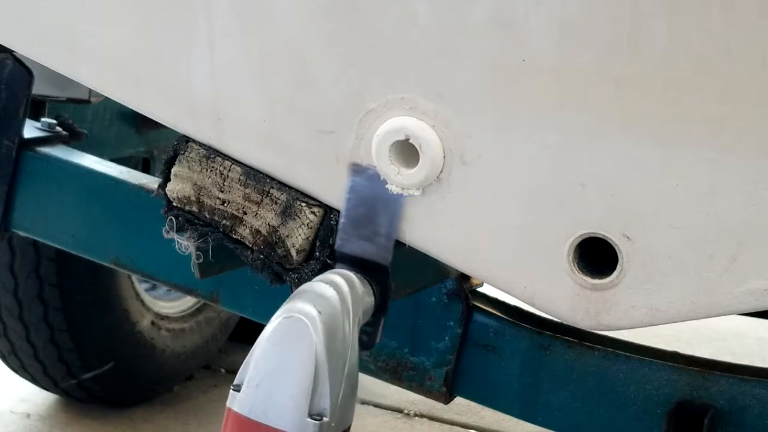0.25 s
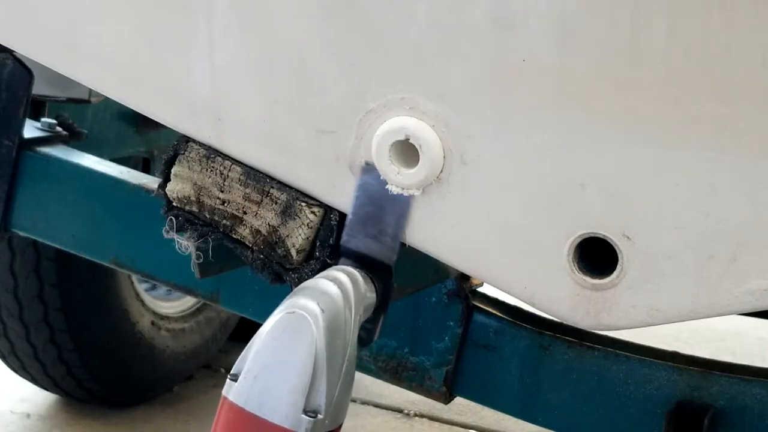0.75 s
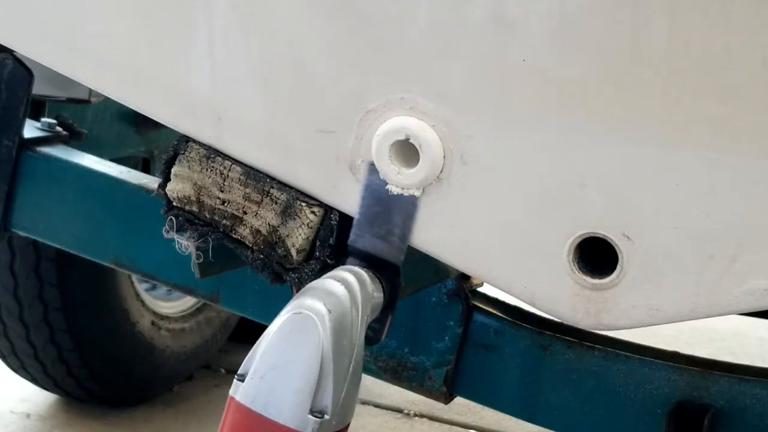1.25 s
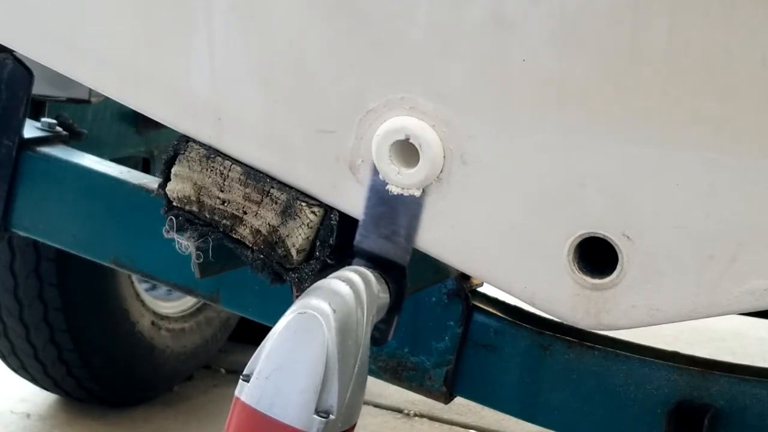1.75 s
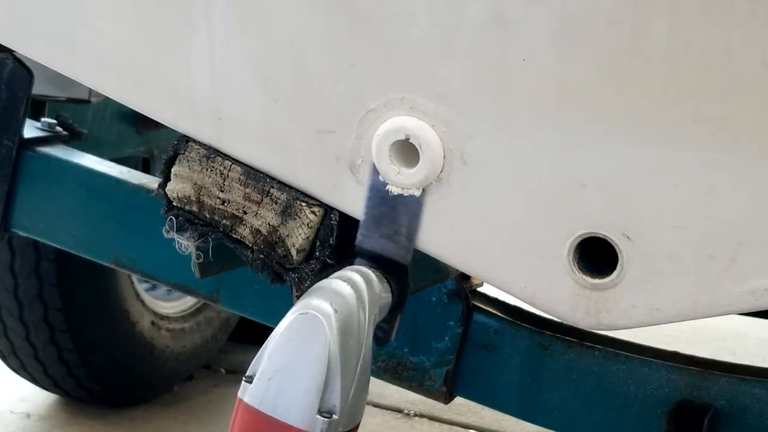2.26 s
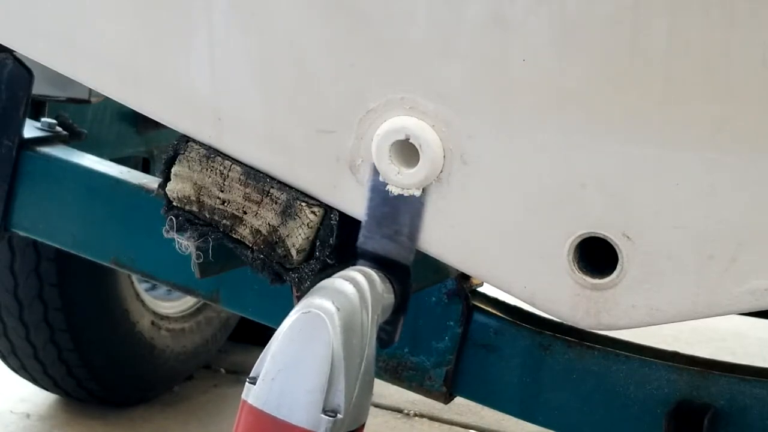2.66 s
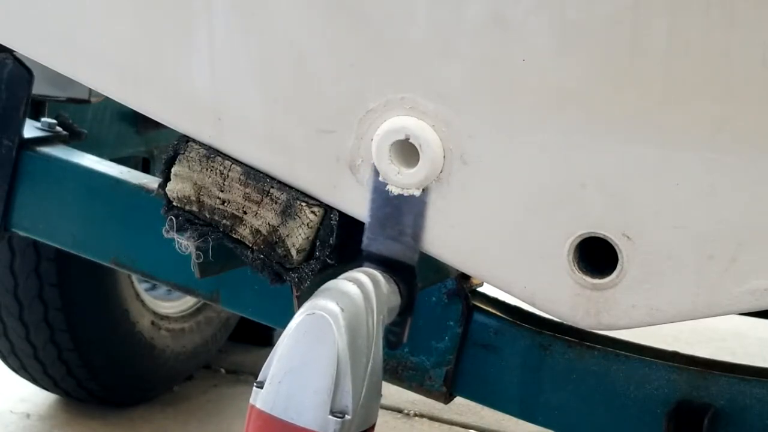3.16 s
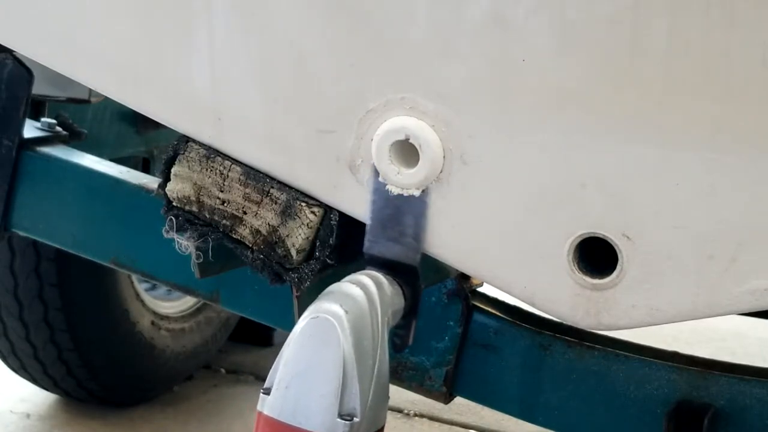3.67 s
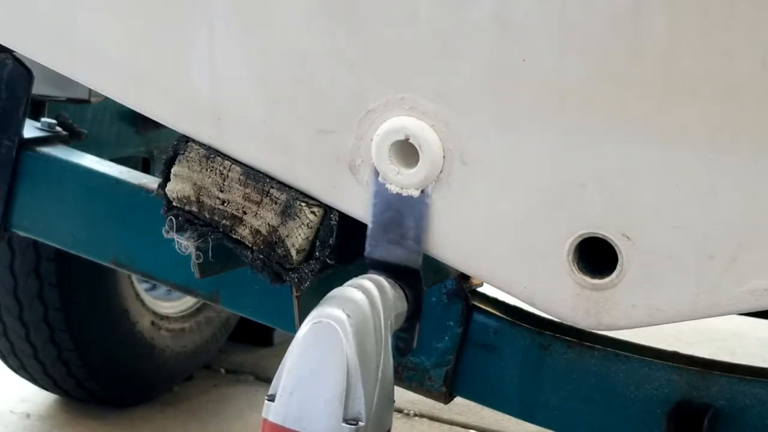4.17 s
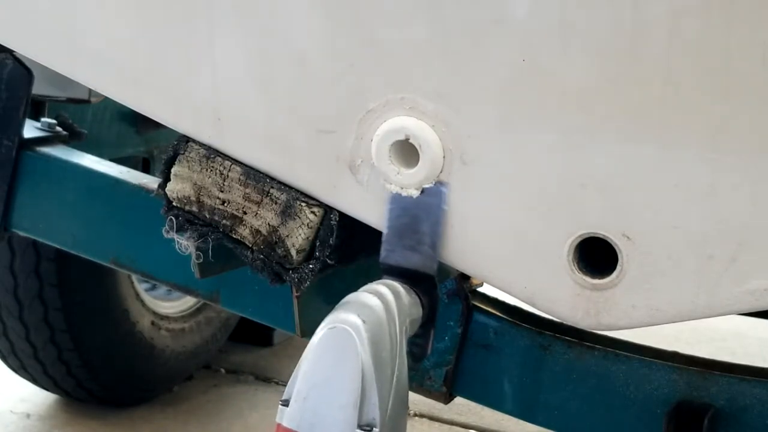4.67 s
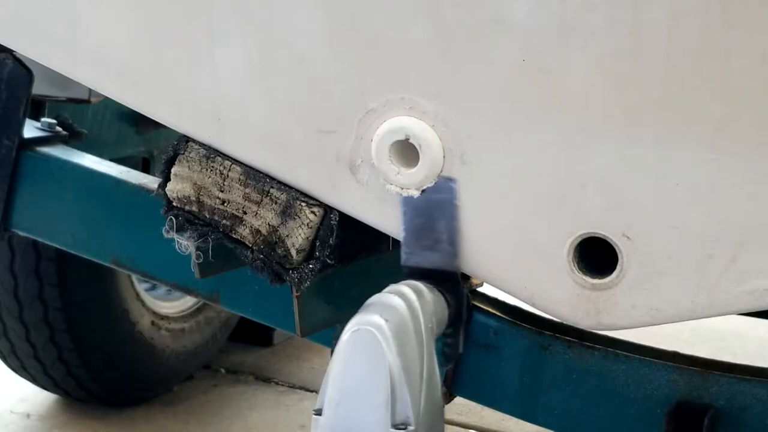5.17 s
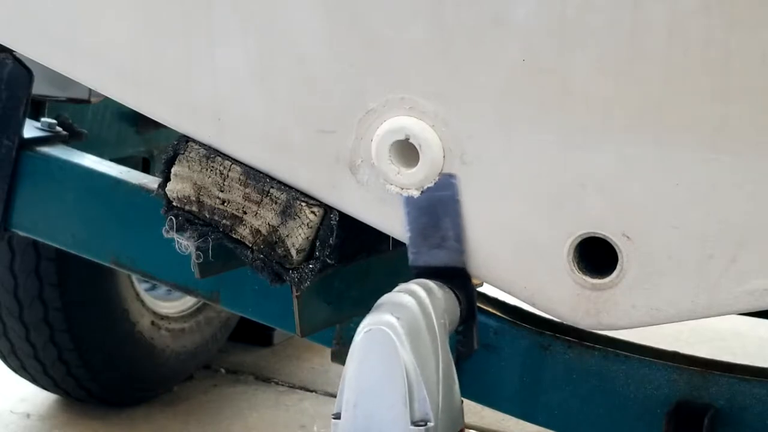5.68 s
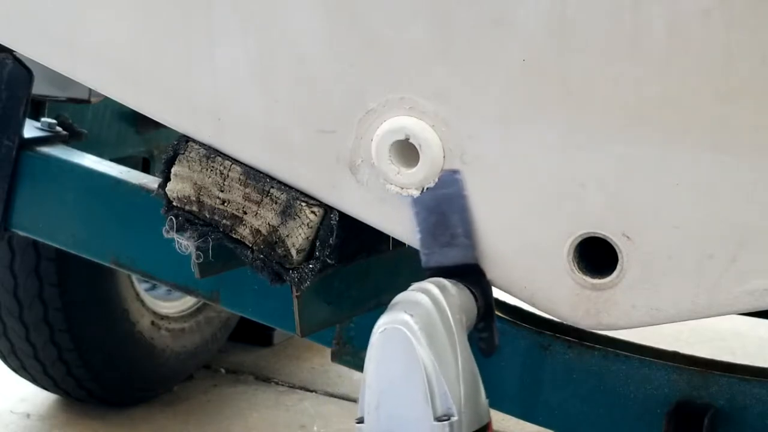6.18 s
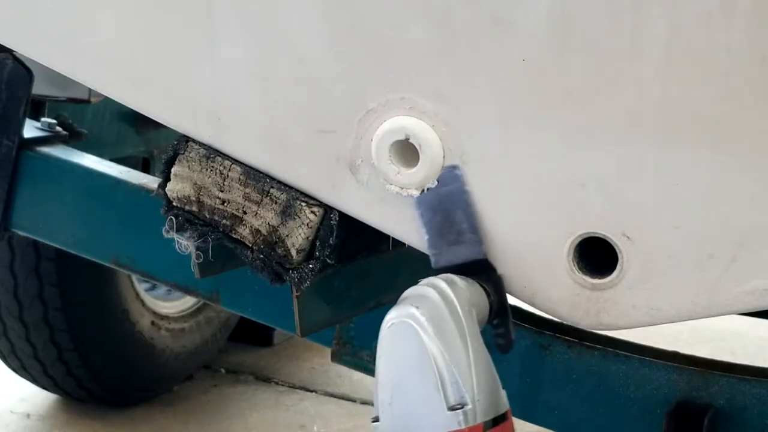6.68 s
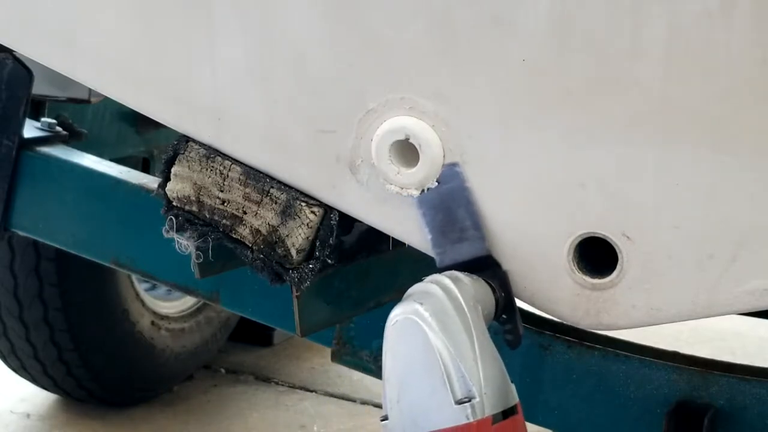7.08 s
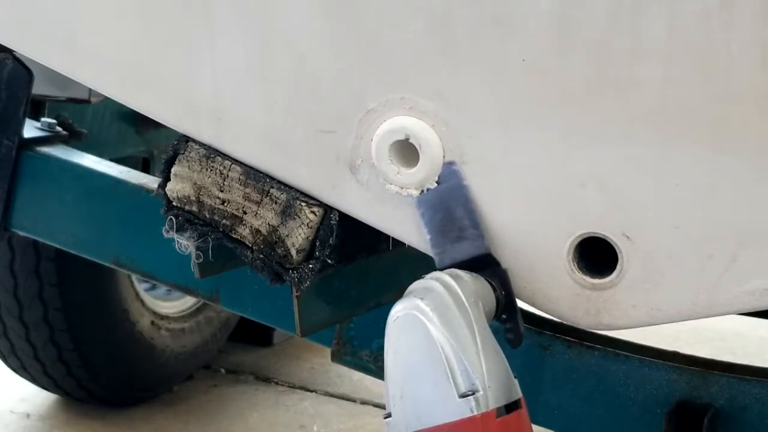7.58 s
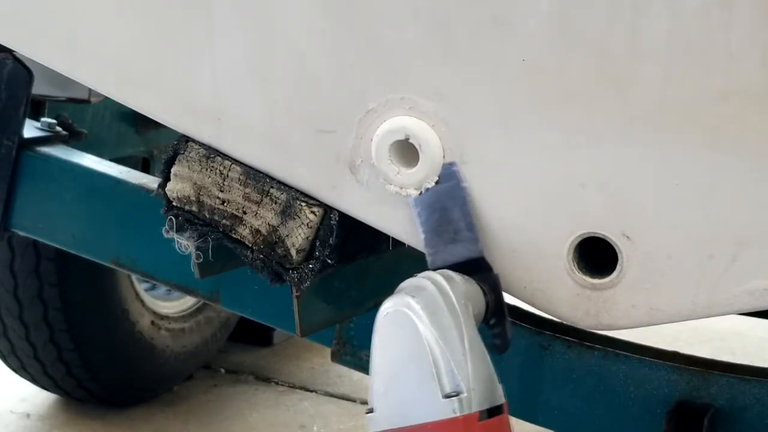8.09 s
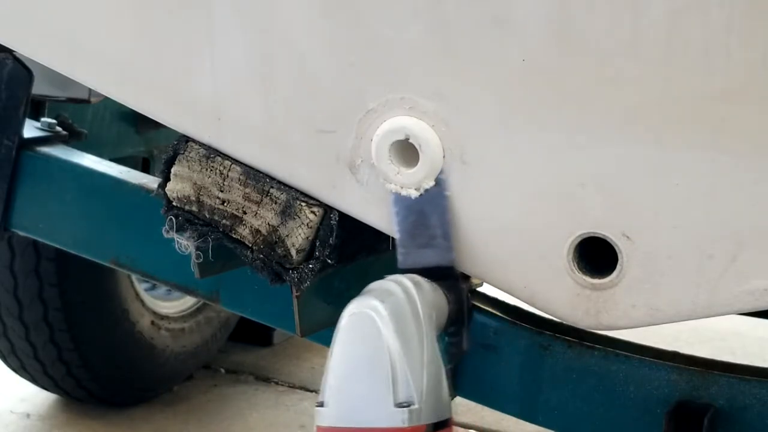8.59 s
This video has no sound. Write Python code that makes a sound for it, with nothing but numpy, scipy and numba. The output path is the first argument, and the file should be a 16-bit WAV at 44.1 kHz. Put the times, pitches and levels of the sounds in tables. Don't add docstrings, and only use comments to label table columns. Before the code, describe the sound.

An oscillating multi-tool is already running at the start, close in stereo outdoors, with a steady, nasal electric buzz, clean and rich in overtones, over airy motor whirr. The first half second is light and dull at the teeth. From about 0.7 seconds the blade bites the fibreglass hull: grinding brightens, a short high ring flashes, and the pitch slides down by nearly an octave, reaching a heavy, throaty growl at about 2.6 seconds with low boat and trailer shudder. It stays bogged until 3.5, then climbs. Around 4.3 to 4.8 the teeth nearly lift and the grit and buzz thin out, before full, bright cutting resumes near the highest recovered pitch at 5.3. A thin metallic singing rides above until 6.7. A rough chatter burst comes near 6.1, a stronger one at 7.2 to 7.7, a short one at 8.45, while pitch sags gradually to the cut-off at 8.8, still running.

```python
import sys
import numpy as np
from scipy import signal
from scipy.fft import rfft, irfft, next_fast_len
from scipy.io import wavfile
from scipy.ndimage import uniform_filter1d
from numba import njit

SR = 44100
rng = np.random.default_rng(int(sys.argv[2]) if len(sys.argv) > 2 else 0)


def pcm_store(signal):
    levels = np.round(np.clip(np.atleast_2d(signal), -1, 1) * 32767)
    wavfile.write(sys.argv[1], SR, levels.astype(np.int16).T)


def gain_from_db(level_db):
    decades = np.asarray(level_db, float) / 20
    return 10 ** decades


N = 389844
STEP = 128

# time in seconds, strokes per second.
SPEED = [(0.0, 246.0), (0.5, 247.0), (0.69, 242.1), (0.86, 232.2), (1.92, 159.7), (2.17, 151.6),
         (2.58, 140.7), (2.98, 144.9), (3.53, 148.4), (4.0, 167.7), (4.34, 187.7), (4.53, 208.9),
         (5.13, 224.8), (5.3, 226.1), (6.07, 218.4), (7.49, 212.9), (7.93, 200.1), (8.84, 187.8)]
# time in seconds, push on the panel in dB, bite of the teeth in dB.
CUT = [(0, -44.5, -32.5), (.2, -50.5, -31.5), (.85, -35, -29), (1.15, -33.5, -30), (1.7, -24.5, -31),
       (2.05, -37.5, -30.5), (2.5, -28.5, -32), (2.8, -16, -30.5), (3.5, -18.5, -32.5), (3.85, -42, -34),
       (4.25, -27.5, -33.5), (4.4, -49.5, -34), (4.9, -33, -28.5), (6.2, -28.5, -28), (7.15, -27, -28),
       (7.55, -18.5, -27.5), (8.45, -20.5, -31.5), (8.84, -30.5, -34)]
# start and end in seconds, grinding in dB, buzz in
# dB, dullness in dB.
EASES = [
    (-.1, .65, -3, 0, 11),
    (7.16, 7.7, 0, -3, 0),
    (4.325, 4.775, -12, -8, 14),
]

# frequency in Hz, correlation from 0 to 1.
LIKENESS = [(60, .97), (130, 0.99), (200, 0.99), (330, 0.79), (640, 0.9), (1410, 0.19), (3100, 0.3),
            (6820, 0.46), (15000, 0.19)]
# frequency in Hz, left over right in dB.
LEAN = [(60, 0.0), (110, 0.0), (200, 0.0), (380, -0.5), (700, -0.5), (1290, -1.0), (2380, 1.0), (4400, 0.0),
        (8120, -1.0), (15000, -2.0)]

# frequency in Hz, density in dB per Hz.
WHIRR = [(25, -31), (60, -16.5), (145, -19.5), (290, -25.5), (470, -10.5), (750, -6), (1200, -5.5),
         (1900, -2.5), (4150, -8.5), (5500, -14), (7200, -23.5), (10300, -20), (13000, -23), (15500, -21)]
# order in multiples of the stroke rate, level in dB.
BEARING = [(2.56, -43), (3.56, -56), (7.44, -52), (10.56, -54)]

# frequency in Hz, density in dB per Hz.
KNOCK = [(60, -36), (85, -9), (120, -1.5), (300, -6.5), (700, -6), (1500, -1.5), (2800, -2.5), (5000, -21),
         (7000, -24)]
# centre in Hz, width in Hz, lift in dB.
KNOCK_RING = [(4680, 360, 24.5)]
# start and end in seconds, lift in dB.
BOUTS = [
    (0, 3.7, 9),
    (1.9, 3.4, 3),
    (4.6, 5.95, 5),
    (5.95, 6.28, 19),
    (6.1, 6.25, 5),
    (7.15, 7.76, 22),
    (7.16, 7.3, 5),
    (7.48, 7.68, 4),
    (7.76, 8.1, 8),
    (8.4, 8.54, 21),
]

# frequency in Hz, density in dB per Hz.
GRIT = [(150, -35), (250, -15), (277, -20), (507, -47), (658, -5), (755, -21), (882, -18.5), (961, -15),
        (1290, -8), (3700, -14), (4630, -8.5), (7250, -29), (10200, -10.5), (13000, -20), (15500, -28.5)]
# centre in Hz, width in Hz, lift in dB.
GRIT_MODES = [(9650, 600, 3.5), (12850, 280, 8.5)]
# start and end in seconds, lift in dB, pitch in Hz.
RINGS = [(-.1, .62, -12, 4930), (0.806, 0.918, 9, 4550), (1.099, 2.106, 5, 4720), (2.24, 2.467, 3.5, 4740),
         (2.853, 3.307, 2.5, 4660), (3.9, 4.31, 7.5, 4800), (4.55, 4.741, 3, 4360), (5.208, 5.85, 6, 4700),
         (5.845, 6.107, 8, 5380), (6.308, 7.012, 10, 4550), (7.007, 7.501, 10, 4670),
         (7.52, 8.452, 7, 4870), (8.61, 8.77, 9, 4700)]
# start and end in seconds, lift in dB.
SINGS = [
    (-.1, .78, -10),
    (.8, .92, 22),
    (3.5, 4.3, 9.5),
    (4.5, 4.75, 2),
    (4.8, 6.7, 13.5),
    (4.84, 4.96, 3),
    (7.7, 8.1, -5),
    (6.7, 7.4, 4),
    (8.45, 8.9, 8),
]
# start and end in seconds, lift in dB, pitch in Hz.
PLATE_RINGS = [
    (.66, 1.0, 14, 10000),
    (1.6, 2.4, 9, 10000),
    (2.8, 3.45, 11, 9600),
    (4.8, 5.8, 13, 9550),
    (5.8, 7.45, 11, 10000),
    (7.55, 8.15, 14, 9650),
    (8.15, 8.9, 9, 9900),
]

# centre in Hz, width in Hz, lift in dB.
PANEL = [(292.6, 32, 15.5), (341, 83, 13.5), (571, 31, 11), (669.8, 99, 16), (918, 237, 17)]
# start and end in seconds, order, lift in dB.
SHIFTS = [(.03, 0.088, 1, -9), (0.086, .15, 1, 12.5), (0.3, .22, 1, -5), (0.238, 0.31, 1, 12),
          (0.2, .54, 1, -7), (1.296, 1.405, 1, 7), (1.4, 1.65, 1, -5.5), (2, 2.17, 1, -8),
          (2.138, 2.15, 1, 10), (2.229, 2.4, 1, 8), (3.84, 3.923, 1, -19), (4.345, 4.378, 1, -12),
          (0, 0.65, 2, 9.5), (0.855, 1.01, 2, 13), (2, 2.498, 2, -5), (3.757, 4.096, 4, -10),
          (7.495, 8.5, 2, 2), (0.145, 0.224, 3, 6.5), (0.77, 1.3, 3, 3.5), (4.31, 4.72, 3, -4),
          (4.994, 6.1, 3, 2.5), (7.5, 7.7, 3, -4.5), (1.7, 2.16, 4, 3), (2.6, 3.318, 4, -17),
          (4.296, 4.764, 4, -6), (5.989, 6.294, 4, -4.5), (7.28, 8.195, 4, 10.5), (8.59, 8.9, 4, 7.5),
          (5, 6, 2, 3.5), (1, 1.05, 4, 5), (1.35, 2.9, 4, -2), (6.9, 7.5, 2, -10), (5.6, 5.97, 4, 1),
          (7.45, 7.56, 4, -4), (2.5, 2.46, 1, -6), (2.5, 2.55, 1, -9), (4.5, 5.1, 2, -7)]
# time in seconds, half-order level in dB.
LIMP = [
    (8.36, -95),
    (8.43, -42),
    (8.55, -38),
    (8.68, -42),
    (8.78, -70),
]
# frequency in Hz, level in dB.
BUZZ = [(410, -33), (700, -15.5), (920, -6), (1110, -3), (1500, -3), (2220, -3.5), (3790, -13),
        (4420, -7.5), (5950, -15), (7110, -31.5), (8600, -32), (10400, -22), (12000, -62), (15600, -49),
        (22000, -120)]
# centre in Hz, width in Hz, lift in dB.
HULL = [(956, 63, 9.5), (1759, 120, 4.5), (2980, 680, 4.5)]
# centre in Hz, width in Hz, lift in dB.
SEAMS = [(1500, 24, 3.5), (1817, 74, 8), (1890, 24, 7.5), (2195, 100, 6.5), (2500, 150, -1.5)]
# start and end in seconds, lift in dB.
MIRRORED = [
    (1.4, 4.5, -6.5),
]
# start and end in seconds, order, lift in dB.
SWELLS = [(0.073, 0.27, 10, 6.5), (0.535, 0.73, 8, 8.0), (0.547, 0.75, 13, 7), (0.55, 0.95, 10, 4.0),
          (0.81, 1.13, 5, 4), (0.85, 0.93, 9, 5), (0.963, 1.17, 7, 7), (0.97, 1.365, 11, 5.5),
          (1.329, 2.61, 6, 6), (1.351, 1.83, 12, 3.5), (1.412, 2.21, 7, 4.5), (1.723, 1.823, 11, 7.5),
          (1.79, 2.754, 13, 5.0), (2.13, 2.253, 13, 6.5), (2.23, 2.33, 9, 7), (2.55, 3.83, 8, 2.5),
          (2.79, 4.39, 12, 4.5), (2.93, 3.563, 10, 7), (3.45, 3.771, 5, 6.5), (3.493, 3.69, 7, 5),
          (3.512, 3.71, 6, 5.5), (4.67, 4.99, 11, 6), (4.925, 5.893, 7, 4.0), (5.05, 5.21, 13, 6),
          (5.25, 5.492, 8, 4.5), (5.43, 6.23, 11, 4), (5.886, 7.49, 7, 5.5), (6.45, 6.8, 14, 5),
          (6.79, 7.032, 12, 7), (6.83, 8.11, 11, 3), (7.211, 7.33, 7, 6), (7.531, 8.17, 10, 4.5),
          (7.584, 7.826, 7, 8.5), (7.849, 8.81, 13, 4), (7.868, 8.83, 6, 3), (8.33, 8.53, 5, 6.5),
          (8.346, 8.83, 9, 5), (3.97, 4.2, 13, 2), (4.38, 4.5, 11, -9)]
# start and end in seconds, order, lift in dB.
GLINTS = [(0.29, 0.49, 18, 8.0), (0.59, 0.99, 14, 5), (0.63, 1.27, 15, 6.0), (0.71, 2.31, 30, 6),
          (0.97, 1.29, 22, 5.5), (0.97, 2.25, 32, 6.0), (1.17, 2.77, 34, 4.5), (1.35, 1.67, 18, 7.5),
          (1.55, 3.15, 28, 3), (1.67, 1.77, 23, 12), (1.93, 3.53, 22, 2), (1.99, 3.59, 24, 3),
          (2.11, 2.23, 15, 9.5), (2.33, 3.93, 36, 7.5), (2.53, 2.73, 14, 12), (2.631, 3.025, 27, 7.0),
          (2.67, 2.99, 17, 3), (2.69, 2.89, 16, 11), (2.77, 4.37, 20, 4.5), (2.87, 3.67, 26, 6.5),
          (3.01, 3.41, 23, 2), (3.53, 3.85, 34, 10), (3.71, 3.83, 30, 11.5), (4.71, 5.99, 15, 3.5),
          (5.07, 5.17, 24, 9), (5.15, 6.43, 25, 5.0), (5.25, 6.85, 16, 4.5), (5.37, 5.776, 14, 6.5),
          (5.45, 6.09, 35, 5), (5.55, 7.15, 18, 3), (5.63, 5.87, 17, 10), (5.73, 6.05, 19, 6),
          (5.73, 7.01, 36, 8.5), (6.23, 6.625, 27, 6), (6.314, 6.549, 21, 10), (6.51, 6.711, 26, 7),
          (6.53, 6.608, 15, 7), (6.549, 6.787, 22, 10), (6.61, 7.012, 24, 4), (7.27, 7.39, 22, 4),
          (7.267, 7.428, 21, 10), (7.48, 7.787, 23, 10), (7.63, 7.87, 21, 5), (7.772, 8.09, 24, 4),
          (8.27, 8.43, 26, 7.5)]
# start and end in seconds, order, lift in dB.
FADES = [(-0.01, 0.63, 9, -4.5), (0.49, 0.65, 6, -12), (0.95, 2.55, 23, -5), (1.15, 1.347, 5, -3),
         (1.25, 1.73, 25, -7.5), (1.45, 1.53, 11, -10.5), (1.45, 2.09, 10, -8.0), (1.91, 2.016, 11, -15),
         (2.128, 2.45, 12, -8.0), (2.23, 2.55, 11, -5.5), (2.27, 2.358, 13, -14), (2.43, 4.03, 31, -6.5),
         (2.63, 3.59, 15, -5.5), (2.91, 3.55, 19, -8), (3.77, 5.05, 29, -8), (3.85, 5.13, 25, -2),
         (4.127, 5.087, 10, -3.5), (4.272, 5.87, 5, -6.5), (4.674, 6.27, 8, -3.5), (4.77, 6.37, 28, -5.5),
         (4.83, 5.63, 12, -5), (4.99, 5.39, 21, -8), (5.09, 5.73, 22, -10.0), (5.71, 6.51, 6, -2.5),
         (5.73, 7.33, 23, -9), (5.87, 7.15, 21, -5.5), (5.89, 6.29, 29, -12.5), (5.97, 7.57, 13, -6.0),
         (6.01, 7.61, 19, -4.0), (6.03, 6.23, 24, -12.0), (6.673, 7.15, 7, -2), (6.95, 7.03, 21, -9.0),
         (7.05, 7.29, 17, -13), (7.07, 7.71, 24, -8.5), (7.17, 7.969, 20, -7.5), (7.373, 7.85, 25, -6.5),
         (7.41, 8.69, 22, -11), (7.51, 7.99, 14, -9.0), (7.61, 8.01, 26, -9.0), (7.69, 8.652, 16, -8),
         (7.71, 8.51, 27, -6.0), (7.87, 8.11, 23, -4), (7.87, 8.67, 21, -13), (7.875, 8.83, 5, -8.0),
         (7.91, 8.11, 9, -8), (8.067, 8.27, 24, -14), (8.13, 8.289, 8, -7), (8.27, 8.75, 29, -12),
         (8.45, 8.77, 24, -9), (8.513, 8.83, 10, -8)]
# start and end in seconds, order, lift in dB.
MORE_LIFTS = [(0.39, 0.51, 7, -12.5), (0.49, 0.548, 12, 12), (0.97, 1.61, 10, -4), (1.01, 1.09, 8, -10),
              (1.01, 1.09, 20, -16.5), (1.21, 1.61, 15, -5.5), (1.45, 1.51, 5, -12.0), (1.49, 1.97, 17, -8.0),
              (1.95, 2.35, 6, -6), (1.97, 2.09, 13, -12.5), (2.47, 2.71, 12, 10.0), (2.61, 3.41, 9, 3.5),
              (2.67, 3.63, 7, 4.5), (2.709, 3.67, 18, 6.5), (2.83, 3.47, 17, -7.5), (2.87, 3.83, 6, -4),
              (2.95, 3.35, 8, -7.0), (2.95, 3.35, 21, -8.5), (2.95, 3.91, 19, -8.0), (2.97, 3.93, 13, -4.5),
              (2.99, 3.23, 20, -13.0), (3.67, 4.07, 14, -9.0), (3.93, 4.25, 7, -10.5), (4.09, 4.15, 11, -12.5),
              (4.172, 4.25, 10, -13), (4.39, 4.711, 9, -11.0), (4.73, 5.37, 6, 4.0), (5.07, 5.87, 23, 5),
              (5.07, 6.03, 8, -3.5), (5.37, 5.771, 13, -4), (5.59, 6.07, 7, 4.5), (5.79, 6.59, 21, -3.5),
              (5.83, 6.31, 5, -8.0), (5.93, 6.013, 11, -19), (6.09, 6.729, 19, -9.0), (6.19, 7.15, 23, 5.5),
              (6.61, 6.81, 15, -18.0), (6.85, 7.17, 7, 4.5), (7.35, 7.43, 7, -10.5), (7.572, 7.691, 8, 10.0),
              (7.67, 8.15, 9, -6), (7.71, 7.95, 22, 11.5), (7.77, 8.41, 16, 7.5), (7.77, 8.73, 15, -6),
              (7.79, 7.89, 11, -9.5), (7.974, 8.37, 24, 6.5), (8.09, 8.29, 13, -8.0), (8.13, 8.61, 7, -13.0),
              (8.21, 8.687, 9, 5), (8.41, 8.65, 11, -11.5)]


def rms_one(x):
    return x / np.sqrt(np.mean(np.abs(x) ** 2) + 1e-20)


def in_time(rows, step=1):
    s, *columns = np.transpose(rows)
    now = np.arange(0, N + step, step)[:N] / SR
    return [np.interp(now, s, column) for column in columns]


def at_hz(points, hz):
    table_hz, value = np.transpose(points)
    return np.interp(np.log(hz + 1), np.log(table_hz + 1), value)


def lifts(modes, hz):
    return sum(db / (1 + (2 * (hz - centre_hz) / width_hz) ** 2) for centre_hz, width_hz, db in modes)


def smooth(coarse):
    return np.interp(np.arange(N) / STEP, np.arange(len(coarse)), coarse)


def drift(rate_hz, count):
    r = np.exp(-2 * np.pi * rate_hz * STEP / SR)
    noise = rng.standard_normal((count, N // STEP + 602))
    return rms_one(signal.lfilter([1], [1, -2 * r, r * r], noise)[:, 600:])


def spans(rows, edge_s=0.02):
    s = np.arange(N // STEP + 2) * STEP / SR
    rows = np.array(rows, float)
    risen = np.tanh((s - rows[:, :1]) / edge_s)
    fallen = np.tanh((s - rows[:, 1:2]) / edge_s)
    return rows[:, 2:].T @ ((risen - fallen) / 2)


def swells(orders, rows):
    return spans([(start, end, *(lift_db * (orders == round(order)))) for start, end, order, lift_db in rows])


def ripple(hz, spacing_hz):
    grid_hz = np.arange(0, SR / 2, spacing_hz)
    return np.interp(hz, grid_hz, rms_one(rng.standard_normal(400))[:len(grid_hz)])


def spread(hz):
    alike = np.clip(at_hz(LIKENESS, hz), 0, 1)
    lean = gain_from_db(at_hz(LEAN, hz) / 2)
    return np.sqrt(1 + alike), np.sqrt(1 - alike), np.array([lean, 1 / lean])


def coloured(pair, spectrum, modes=(), tied=.5):
    size = next_fast_len(N)
    hz = np.arange(size // 2 + 1) * SR / size
    mid, side = rfft(pair, size) * gain_from_db(at_hz(spectrum, hz) + lifts(modes, hz))
    lag = tied * (hz > 5000)
    side = (side + 1j * lag * mid) / np.hypot(1, lag)
    m, s, lean = spread(hz)
    return rms_one(irfft(lean * [m * mid + s * side, m * mid - s * side], size)[:, :N])


def narrow(hz, width_hz, alike):
    low = signal.butter(2, width_hz / 2, fs=SR, output="sos")
    slow = signal.sosfilt(low, rng.standard_normal((4, N)))
    carrier = np.exp(2j * np.pi * np.cumsum(hz + np.zeros(N)) / SR)
    mid, side = ((slow[:2] + 1j * slow[2:]) * carrier).real
    return rms_one(mid + np.clip(1 - alike, 0, 1) * side * [[1], [-1]])


@njit
def overtones(turns, orders, gains, step):
    out = np.zeros((2, len(turns)))
    for k in range(len(orders)):
        for i in range(len(turns)):
            j, share = i // step, (i % step) / step
            z = np.exp(2j * np.pi * (orders[k] * turns[i] % 1))
            for c in range(2):
                out[c, i] += (z * (gains[c, k, j] * (1 - share) + gains[c, k, j + 1] * share)).real
    return out


def speed(step=1):
    s, rate = np.transpose(SPEED)
    slope = np.gradient(rate, s)
    now = np.arange(0, N + step, step)[:N] / SR
    j = np.clip(np.searchsorted(s, now) - 1, 0, len(s) - 2)
    gap = s[j + 1] - s[j]
    u = (now - s[j]) / gap
    ease = rate[j] + (rate[j + 1] - rate[j]) * u * u * (3 - 2 * u)
    return ease + gap * u * (1 - u) * (slope[j] * (1 - u) - slope[j + 1] * u)


def contact():
    bite_db = in_time(CUT, STEP)[1]
    grind_db, buzz_db, dull_db = spans(EASES)
    buzz_db = buzz_db - 22.3 + 0.5 * (bite_db + 29)
    return buzz_db, bite_db + grind_db, dull_db - 3.3


def free_blade():
    rest_hz = 4630
    rows = [(start, end, db, hz - rest_hz) for start, end, db, hz in RINGS]
    ring_db, shift_hz = spans(rows, edge_s=0.051)
    return ring_db - 8, rest_hz + shift_hz


def motor():
    return gain_from_db(-32.5) * coloured(rng.standard_normal((2, N)), WHIRR)


def rumble(centre_hz=75):
    load_db = in_time(CUT)[0] + 60 * np.log10(145 / speed())
    body = signal.butter(2, [centre_hz / 1.7, centre_hz * 1.6], "band", fs=SR, output="sos")
    mid, side = signal.sosfilt(body, rng.standard_normal((2, N)))
    return gain_from_db(-43 + 0.62 * load_db) * rms_one(mid + .12 * side * [[1], [-1]])


def chatter(turns):
    at = np.flatnonzero(np.diff(np.floor(4 * turns)))
    knocks = np.zeros((2, N))
    knocks[:, at] = np.sign(rng.standard_normal((len(at), 2)).T)
    level_db = -67.5 + 17.0 + smooth(spans(BOUTS, edge_s=0.017)[0])
    return gain_from_db(level_db) * coloured(knocks, KNOCK, KNOCK_RING)


def plate(turns, rest_hz=9800, width_hz=500):
    orders = np.arange(40, 72)
    hz = orders[:, None] * speed(STEP)
    lift_db, shift_hz = spans([(start, end, db, f - rest_hz) for start, end, db, f in PLATE_RINGS], edge_s=.03)
    bell = 1 / (1 + ((hz - rest_hz - shift_hz) / width_hz) ** 2)
    level = bell * gain_from_db(-55 + lift_db + 3.0 * drift(9.0, len(orders)))
    phase = 2 * np.pi * rng.random((len(orders), 1)) + .6 * drift(12.0, len(orders))
    lag = .8 * drift(3.0, len(orders))
    return overtones(turns, 1. * orders, level * np.exp(1j * np.array([phase + lag, phase - lag])), STEP)


def grinding(turns, depth=0.25, uneven=0.1, flicker_db=1.0):
    buzz_db, level_db, dull_db = map(smooth, contact())
    ring_db, blade_hz = map(smooth, free_blade())
    swing = 1 + depth * np.cos(4 * np.pi * turns) + uneven * np.cos(2 * np.pi * turns)
    swing = swing * gain_from_db(flicker_db * smooth(drift(17.0, 1)[0]))
    grit = coloured(rng.standard_normal((2, N)) * swing, GRIT, GRIT_MODES)
    low = signal.sosfilt(signal.butter(4, 6500, fs=SR, output="sos"), grit)
    dulled = grit + (gain_from_db(dull_db) - 1) * low
    ring = narrow(uniform_filter1d(blade_hz, size=4000), width_hz=450, alike=0.91)
    ring *= gain_from_db(buzz_db + 3 * ring_db - 17.0)
    sing = narrow(hz=10620, width_hz=160, alike=0.9)
    sing *= gain_from_db(-48 - 3.0 + smooth(spans(SINGS, edge_s=0.048)[0]))
    return gain_from_db(level_db + 0.5) * dulled + swing * (ring + sing)


def panel(rate):
    push_db, bite_db = in_time(CUT, STEP)
    orders = np.arange(1, 5)
    off_resonance_db, flicker_db = np.c_[[-54, -44.5, -51]], np.c_[[1.8, 0.56, 2.5]]
    next_db = off_resonance_db + lifts(PANEL, orders[1:, None] * rate) + bite_db + 29
    next_db += flicker_db * drift(7.0, count=3)
    return np.vstack([push_db, next_db]) + swells(orders, SHIFTS)


def bearing(rate):
    level_db = np.array(BEARING)[:, 1:]
    return level_db + 90 * np.log10(rate / 220) + 3.0 * drift(6, len(BEARING))


def hull_colour(upper, rate):
    buzz_db = contact()[0]
    ring_db, blade_hz = free_blade()
    hz = upper[:, None] * rate
    level_db = buzz_db - 10.0 + at_hz(BUZZ, hz) + lifts(HULL + SEAMS, hz)
    level_db += lifts([(blade_hz, 900, ring_db + 9.5)], hz)
    level_db += swells(upper, SWELLS + GLINTS + FADES + MORE_LIFTS)
    level_db += 1.0 * drift(6.6, len(upper))
    level_db += 1.5 * ripple(hz, spacing_hz=60)
    level_db[(upper >= 12) & (upper % 2 == 0)] += spans(MIRRORED, edge_s=0.086)[0]
    level_db += 2.5 * drift(14.0, len(upper)) * np.minimum(hz / 3000, 1)
    glide = np.abs(np.gradient(rate) * SR / STEP / 60)
    level_db += 2 * np.minimum(glide, 1.2) * (drift(16.0, len(upper)) - .4)
    return level_db


def hull_tones(turns):
    rate = speed(STEP)
    upper = np.arange(5, 56)
    orders = np.concatenate([[.5, 1.5], np.arange(1, 5), np.array(BEARING)[:, 0], upper])
    limp_db = in_time(LIMP, STEP)[0]
    level_db = np.vstack([limp_db, limp_db - 20.0, panel(rate), bearing(rate), hull_colour(upper, rate)])
    level = np.sqrt(2) * gain_from_db(level_db)
    hz = orders[:, None] * rate
    m, s, lean = spread(hz)
    start = np.pi + .18 * orders[:, None] * rng.standard_normal((len(orders), 1))
    shake = 0.065 * np.sqrt(orders[:, None]) * drift(9.9, len(orders))
    short = np.clip((hz - 600) / 900, 0, 1)
    skew = np.pi / 2 + short * (1.6 * ripple(hz, 130) + .8 * drift(2, len(orders)))
    mid = np.exp(1j * (start + shake))
    side = s * mid * np.exp(1j * skew)
    return overtones(turns, orders, lean * level * [m * mid + side, m * mid - side] / np.sqrt(2), STEP)


def scene():
    turns = np.cumsum(speed()) / SR
    background = motor() + rumble()
    blade = chatter(turns) + plate(turns) + grinding(turns)
    return background + blade + hull_tones(turns)


def roll_off(x):
    return signal.sosfilt(signal.butter(12, 15690, fs=SR, output="sos"), x)


def record(dry):
    rounded = 0.7 * np.tanh(dry / 0.88)
    mix = signal.sosfilt(signal.butter(4, 15200, fs=SR, output="sos"), rounded)
    return roll_off(mix)


dry = scene()
out = record(dry)
pcm_store(out)
```